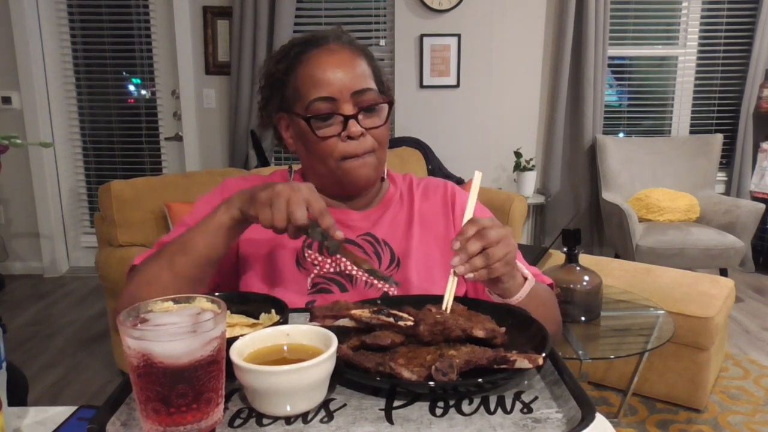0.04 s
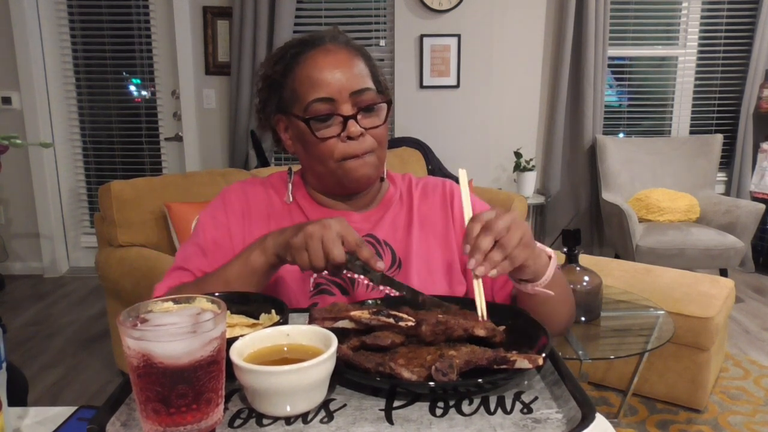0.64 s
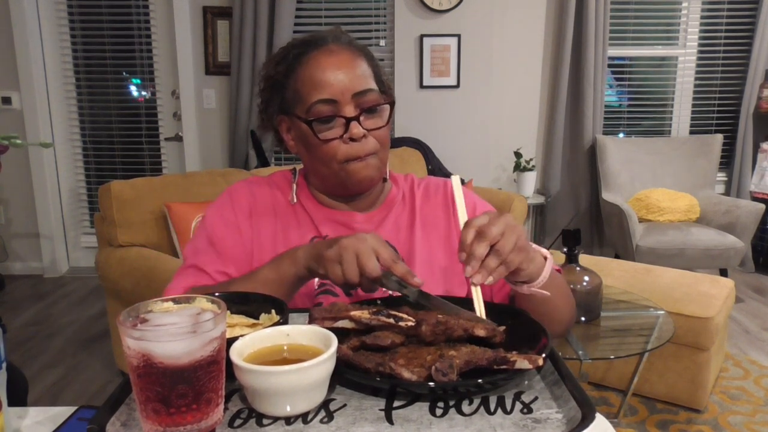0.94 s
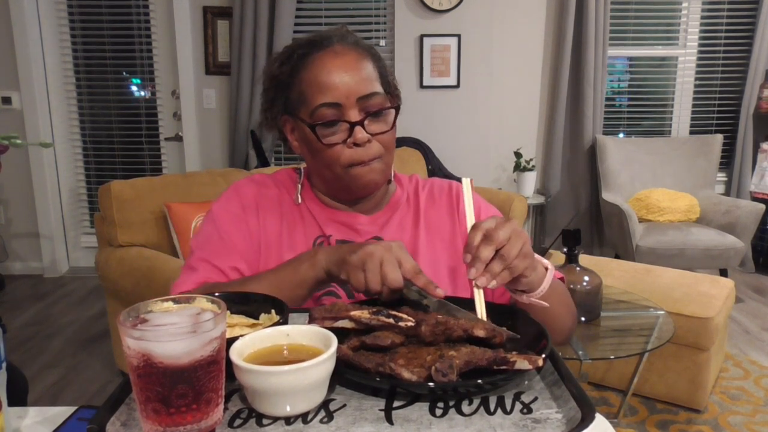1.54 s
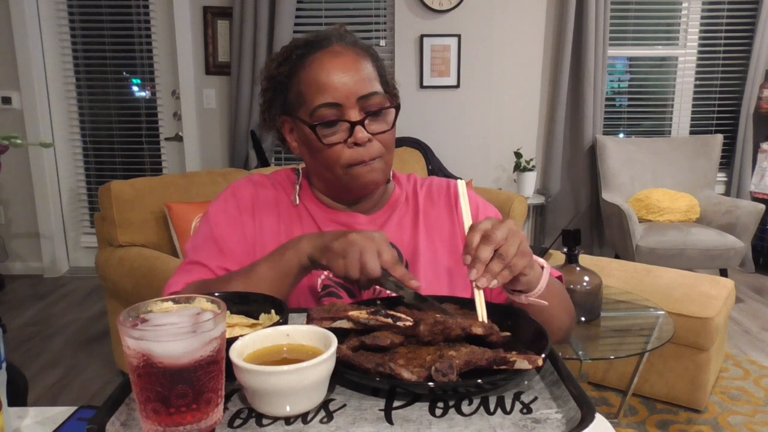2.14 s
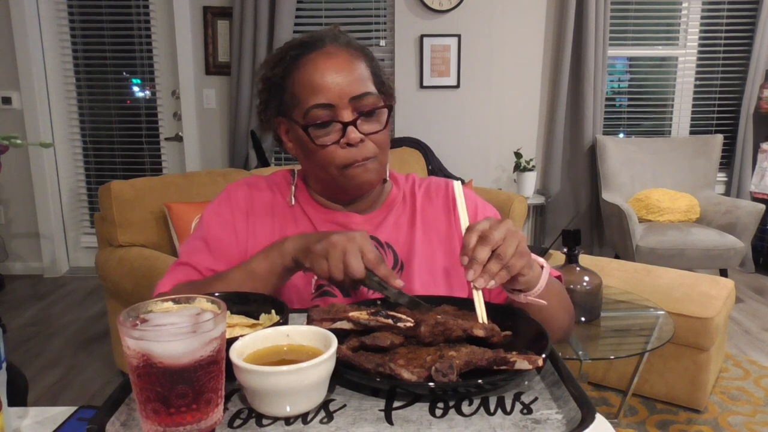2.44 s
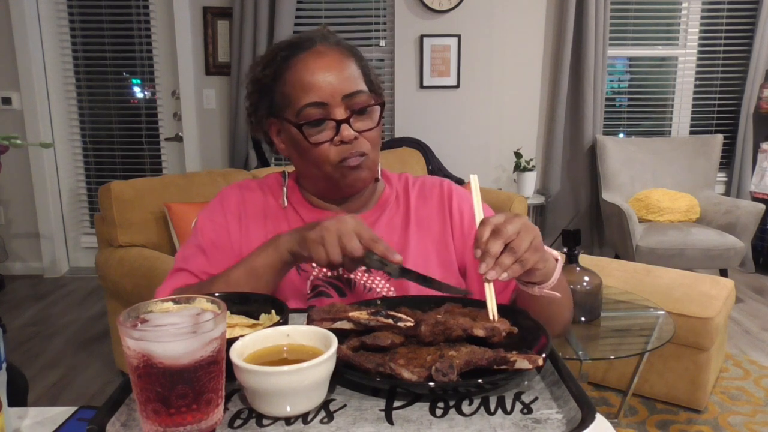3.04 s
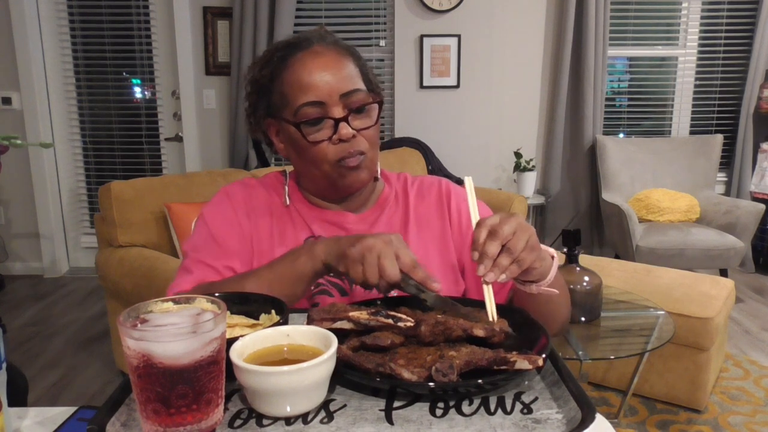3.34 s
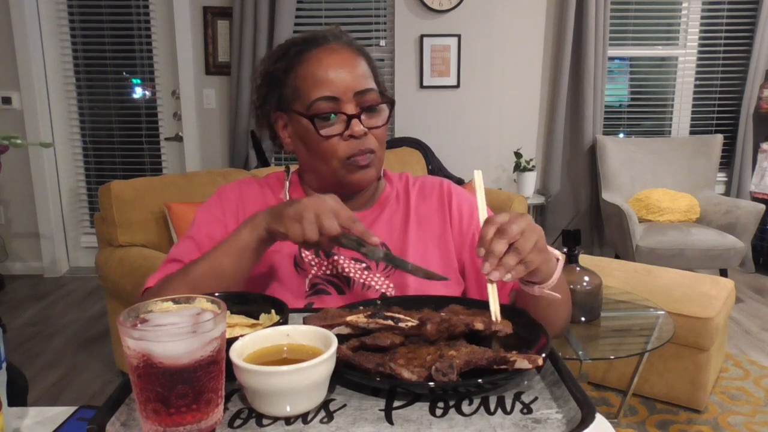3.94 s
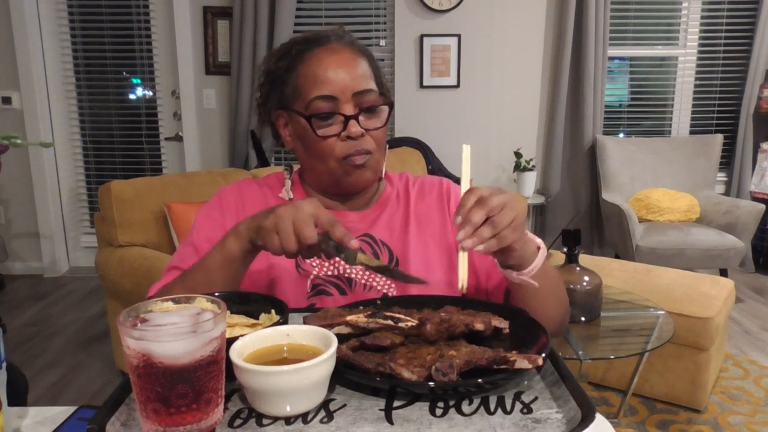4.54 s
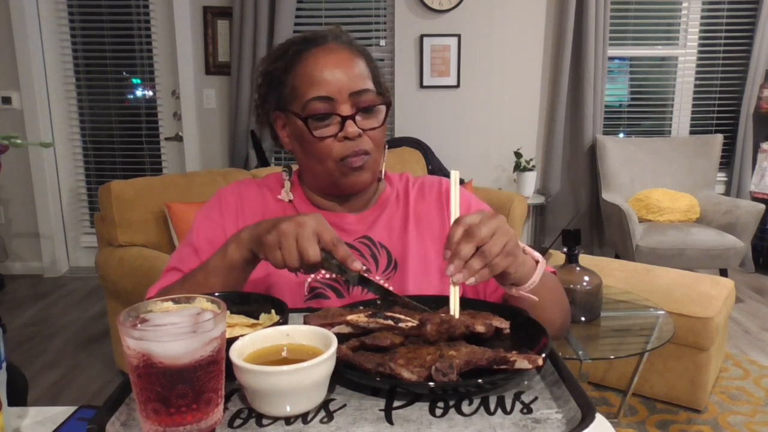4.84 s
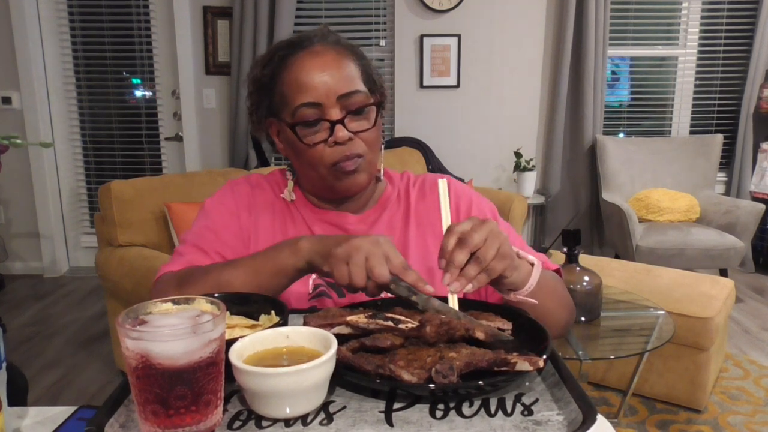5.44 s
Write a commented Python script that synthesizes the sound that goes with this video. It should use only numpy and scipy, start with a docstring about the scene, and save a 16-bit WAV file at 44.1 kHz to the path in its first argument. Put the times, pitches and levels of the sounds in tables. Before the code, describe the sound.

In a living room, a fan gives a steady low hum and rush of air. Close to the microphone, a steel knife strikes a plate with a loud, brief ring, then works through meat, the wet fibres crackling and snapping softly. The serrated blade slips on the plate in thin, squeaky scrapes and touches down lightly. After another, quieter knock, the cutting thins to scattered crackles. The room rings briefly after each knock.

```python
"""You hear a steak knife cutting meat on a plate, close by, in a living room where a fan hums.
The knife knocks twice, ringing its blade and the plate, and touches down lightly a few more times.
Wet fibres crackle and snap as it saws, and its teeth scrape as they catch and slip on the plate.
The room rings after each knock, while an automatic gain control turns the volume down and back up."""
import sys
import numpy as np
from scipy import signal
from scipy.fft import rfft, irfft
from scipy.io import wavfile
from scipy.ndimage import uniform_filter1d

SR = 44100
rng = np.random.default_rng(int(sys.argv[2]) if len(sys.argv) > 2 else 0)


def dump_mix(stems):
    """Bounce the given channels to the path in sys.argv[1] as a 16-bit WAV at rate SR."""
    frames = np.atleast_2d(stems).T  # one column per channel
    limited = np.clip(frames, -1, 1)  # hard clip at full scale
    pcm = np.round(limited * 32767).astype(np.int16)
    wavfile.write(sys.argv[1], SR, pcm)


N = 247401
TIME = np.arange(N) / SR
TOP_HZ = 15900  # upper edge of the treble
# tone colour of a snapping fibre, from low to high: (frequency [Hz], level [dB])
SNAP_COLOUR = [(500, -26), (4000, -19), (6200, -17.5), (7500, -0.5), (9000, -6), (11500, -5.5),
               (14000, -13.5), (16000, -29.5)]


def amp(db):
    """Turns decibels into a factor to multiply by."""
    return 10 ** (np.asarray(db) / 20)


def unit(x):
    """Scales a signal to an average strength (rms) of 1."""
    return x / np.sqrt(np.mean(x ** 2) + 1e-20)


def read(points, hz):
    """Looks up a (frequency, value) table, blending between rows on a pitch scale."""
    table_hz, value = np.transpose(points)
    return np.interp(np.log(hz + 1), np.log(table_hz + 1), value)


def add(mix, start_s, sound):
    """Adds a sound to the mix at the given time."""
    part = mix[..., max(round(start_s * SR), 0):][..., :sound.shape[-1]]
    part += sound[..., :part.shape[-1]]


def through(x, response):
    """Makes every sample of x set off the response; the result has rms 1."""
    return unit(signal.oaconvolve(x, response)[:N])


def click(colour, size=1024):
    """The shortest click with the given tone colour, peak 1."""
    log_gain = np.log(amp(read(colour, abs(np.fft.fftfreq(size, 1 / SR)))))
    pulse = np.fft.ifft(np.exp(np.conj(signal.hilbert(log_gain)))).real
    return pulse / abs(pulse).max()


def burst(colour, decay_s, size=1024):
    """A dying flurry of tiny contacts with the given tone colour, energy 1."""
    t = np.arange(size) / SR
    flurry = rng.standard_normal(size) * np.exp(-t / decay_s)
    even = irfft(np.exp(1j * np.angle(rfft(flurry))))  # all frequencies equally strong
    sound = signal.fftconvolve(even * np.exp(-t / (4 * decay_s)), click(colour))
    return sound / np.linalg.norm(sound)


def ring(tones, size=11025):
    """A struck object rings at its own tones; each fades by 60 dB in its ring time."""
    t = np.arange(size) / SR
    return sum((-1) ** k * amp(db - 60 * t / ring_s) * np.cos(2 * np.pi * hz * t)
               for k, (hz, db, ring_s) in enumerate(tones))


def grains(per_s, spread_db):
    """Clicks of random size at random moments."""
    strength = amp(spread_db * np.minimum(rng.exponential(1, N), 4))
    return strength * rng.choice([-1, 1], N) * (rng.random(N) < per_s / SR)


def pops(per_s, spread_db, cycles, low_hz, count=64, size=128):
    """Tiny contacts, each ringing for a few cycles at its own pitch."""
    hz = np.geomspace(low_hz, TOP_HZ, count)[:, None]
    turns = hz * np.arange(size) / SR
    shapes = hz * turns * np.exp(-2 * turns / cycles) * np.sin(2 * np.pi * turns)
    clicks, pitch = grains(per_s, spread_db), rng.integers(count, size=N)
    starts = np.flatnonzero(clicks)
    places = starts[:, None] + np.arange(size)
    sounds = clicks[starts, None] * shapes[pitch[starts]]
    return unit(np.bincount(places.ravel(), sounds.ravel(), N)[:N])


def waver(below_hz):
    """A slow random wander, rms 1."""
    slow = np.fft.rfftfreq(N, 1 / SR) < below_hz
    return unit(irfft(rfft(rng.standard_normal(N)) * slow, N))


def uneven(depth_db, per_s):
    """A volume that jumps at random as the knife catches and slips, rms 1."""
    step = np.cumsum(rng.random(N) < per_s / SR)
    heights = np.clip(rng.standard_normal(N), -2, 2)
    return unit(uniform_filter1d(amp(depth_db * heights[step]), size=64))


def pushes(rows, attack_s, release_s, growth_db=0):
    """The volume of hand movements: each sets in, holds, grows or wanes, then dies away."""
    gain, t = np.zeros(N), np.arange(SR) / SR
    for start, length, db in rows:
        held = amp(db + growth_db * (np.minimum(t / length, 1) - .5))
        shape = np.minimum(t / attack_s, 1) * held * np.exp(-np.maximum(t - length, 0) / release_s)
        gain += np.interp(TIME, start + t, shape, 0, 0)
    return gain


def left_right(mid, side, likeness):
    """Blends two noises into left and right: likeness 0 is unrelated, 1 is identical."""
    mid, side = mid * np.sqrt(1 + likeness), side * np.sqrt(1 - likeness)
    return np.array([mid + side, mid - side])


def steady_noise(gain):
    """Stereo noise shaped by a gain for each frequency, rms 1."""
    # how alike left and right are: (frequency [Hz], likeness [0-1])
    likeness = [(60, 0.8), (130, 0.76), (290, 0.91), (640, 0.53), (1400, 0.47), (3000, 0.09), (8000, 0.22),
                (15000, 0)]
    hz = np.fft.rfftfreq(N, 1 / SR)
    mid, side = rfft(rng.standard_normal((2, N)))
    return unit(irfft(left_right(mid, side, read(likeness, hz)) * gain, N))


def fan(air_db=-53, drone_db=-51, drone_hz=279, width_hz=22, hiss_db=-66, speed_wander=0.00389):
    """Air rushes, a duct drones and wavering motor tones beat together, over a faint hiss."""
    # tone colour of the rushing air: (frequency [Hz], level [dB])
    air_colour = [(20, -35.5), (45, -40), (70, -7.5), (110, -6.5), (160, -1), (250, 4), (330, -2), (390, 3),
                  (470, -4), (550, -0.5), (650, -8), (1130, -8), (1400, -20), (2000, -32.5)]
    # hum of the motor and the mains power: (pitch [Hz], level [dB])
    hum_tones = [(59.4, -72.5), (199, -68), (255, -75), (283.4, -53), (298, -53), (348.3, -62.5),
                 (415.3, -65), (712.4, -69)]
    # tone colour of the hiss: (frequency [Hz], level [dB])
    hiss_colour = [(500, 10), (1800, 2.5), (2600, 0), (3200, 1), (3480, 10), (3800, -0.5), (4600, 3.5),
                   (5700, -9), (6700, -5), (7500, 6), (10000, 1), (13000, 3.5), (15200, -8.5), (16000, 2)]
    hz = np.fft.rfftfreq(N, 1 / SR)
    air = amp(air_db) * steady_noise(amp(read(air_colour, hz)))
    drone = amp(drone_db) * steady_noise(1 / (1 + ((hz - drone_hz) / (0.71 * width_hz)) ** 2))
    hum = np.zeros(N)
    for pitch_hz, db in hum_tones:
        turns = pitch_hz * np.cumsum(1 + speed_wander * waver(below_hz=4)) / SR + rng.random()
        hum += amp(db) * np.sqrt(2) * np.sin(2 * np.pi * turns)
    hiss = amp(hiss_db) * steady_noise(amp(read(hiss_colour, hz)))
    return air + drone + hum + hiss


def room(x, build_s=0.003, size=44100):
    """The room answers with a few echoes and a wash of reflections whose low notes last longest."""
    # how long the room rings: (frequency [Hz], time to fade by 60 dB [s])
    ring_times = [(250, 1), (1000, 0.48), (3500, 0.58), (7200, 0.52), (10000, 0.46), (15000, 0.25)]
    # how alike the wash is on the left and right: (frequency [Hz], likeness [0-1])
    likeness = [(300, 0.84), (1400, 0.5), (3300, 0.56), (5500, 0.3), (7200, 0), (15000, 0.01)]
    # single bounces off walls and ceiling: (delay [s], level [dB])
    echoes = [(.0097, -15.5), (0.0197, -18.5), (.029, -15.5)]
    # tone colour left after the room soaks up some sound: (frequency [Hz], level [dB])
    room_colour = [(500, -3), (3500, -3.5), (7200, -5), (8200, -7), (9500, -6.5), (12000, -6),
                   (15000, -5.5)]
    hz, t, (mid, side) = signal.stft(rng.standard_normal((2, size)), SR, nperseg=256)
    noise = left_right(mid, side, read(likeness, hz)[:, None])
    decay = amp(-60 * t / read(ring_times, hz)[:, None])
    tail = signal.istft(noise * decay, SR, nperseg=256)[1][:, :size]
    tail *= 1 - np.exp(-np.arange(size) / SR / build_s)
    tail /= np.linalg.norm(tail[0])
    for delay, db in echoes:
        add(tail, delay, amp([db]))
    tone = click(room_colour)
    tail = signal.lfilter(tone / abs(rfft(tone)).max(), [1], tail)
    return signal.fftconvolve(x[None], tail, axes=1)[:, :N]


def bumps(swell_s=0.02, size=8000):
    """The plate or tray gives under a push and sways briefly."""
    # soft bumps under the hands: (time [s], level [dB], pitch [Hz])
    sways = [(0.75, -64.5, 80.2), (1.388, -66.5, 77), (2.19, -45, 409), (4.206, -57.5, 82)]
    out, t = np.zeros(N), np.arange(size) / SR
    swell = t / swell_s * np.exp(1 - t / swell_s)
    for start, db, hz in sways:
        add(out, start, amp(db) * swell * np.sin(2 * np.pi * hz * t))
    return out


def pings(swell_s=0.011, size=16384):
    """A slipping tooth sets one tone of the plate or blade ringing."""
    # tones that swell and ring out: (time [s], level [dB], pitch [Hz], ring time [s])
    tones = [(0.002, -59.5, 2224, 0.27), (2.018, -55, 4150, 0.22), (2.146, -58, 4170, .14),
             (3.706, -61, 4170, 0.4), (3.708, -58, 2910, 0.14), (3.726, -54, 3400, 0.08),
             (3.767, -60, 1735, 0.069)]
    out, t = np.zeros(N), np.arange(size) / SR
    swell = np.minimum(t / swell_s, 1)
    for start, db, hz, ring_s in tones:
        add(out, start, swell * amp(db - 60 * t / ring_s) * np.sin(2 * np.pi * hz * t))
    return out


def dragging(swell_s=0.0083, release_s=.01, size=16384):
    """Rubbing draws a rough tone from blade and plate; its pitch slides as the contact moves."""
    # drags of the blade:
    # (time [s], length [s], level [dB], first pitch [Hz], last pitch [Hz], pitch spread [Hz])
    drags = [(1.833, 0.019, -68, 3010, 3400, 500), (1.99, 0.034, -67, 7400, 7600, 350),
             (2.192, 0.13, -63, 7570, 7760, 450), (2.248, 0.11, -68, 3413, 3750, 400),
             (2.328, .05, -59, 9300, 8560, 1600), (2.496, 0.059, -69, 3510, 3630, 450),
             (2.499, .07, -75, 9400, 9400, 400), (3.497, .03, -63, 7370, 7500, 400),
             (3.435, .1, -63.5, 3030, 3500, 700), (3.55, 0.094, -71, 3430, 3600, 350),
             (3.843, 0.027, -71, 3180, 3200, 450)]
    out, t = np.zeros(N), np.arange(size) / SR
    for start, length, db, first_hz, last_hz, width_hz in drags:
        friction = [1, 1j] @ rng.standard_normal((2, size))
        memory = np.exp(-np.pi * width_hz / SR)  # nearer 1 gives a purer tone
        smoothed = signal.lfilter([1], [1, -2 * memory, memory ** 2], friction)
        flutter = unit(smoothed.view(float)).view(complex)
        pitch_hz = np.interp(t, [0, length], [first_hz, last_hz])
        tone = np.exp(2j * np.pi * np.cumsum(pitch_hz) / SR)
        shape = np.minimum(t / swell_s, 1) * np.exp(-np.maximum(t - length, 0) / release_s)
        add(out, start, amp(db) * shape * (flutter * tone).real)
    return out


def scraping(rasp_db=4, judder_db=1, sing_db=-2, bite_s=0.032, lift_s=0.051):
    """Teeth catch and slip on the plate: they click in a rasp, and the blade judders or sings."""
    # strokes over the plate: (time [s], length [s], rasp [dB], judder [dB], singing [dB])
    strokes = [(-0.04, 0.06, -67.5, -59, -87), (1.782, 0.081, -68, -71, -85),
               (1.956, 0.09, -63.5, -76, -66), (2.129, 0.098, -63.5, -65.5, -58.5),
               (2.262, 0.11, -67, -62, -74), (2.473, 0.08, -65, -64.5, -67), (3.46, 0.13, -67, -68, -66),
               (3.677, 0.051, -71, -65, -78)]
    # tone colour of the tooth clicks: (frequency [Hz], level [dB])
    rasp_colour = [(300, 9), (500, 23.5), (1200, 12), (1800, 5), (2700, -0.5), (3500, 5), (5200, 2.5),
                   (6300, 4.5), (7700, 7), (10000, 4), (13000, -0.5), (16000, -13)]
    # the shaking blade, muffled by the meat: (pitch [Hz], level [dB], ring time [s])
    judder_tones = [(425, 4, 0.03), (1375, -1, 0.0298), (1680, -13.5, 0.015), (2140, -2.5, 0.023),
                    (3430, 2, 0.014), (3900, -6, 0.015), (9500, -24.5, 0.0081)]
    # high tones the blade sings on: (pitch [Hz], level [dB], ring time [s])
    song_tones = [(6280, -2.5, 0.013), (7800, 6, 0.019), (7800, 4, 0.011), (8800, -34, 0.03)]
    slips = grains(per_s=530, spread_db=-4.0)
    grit = pops(per_s=7000, spread_db=2.5, cycles=6, low_hz=600, size=256)
    rasp = amp(rasp_db) * through(grit, click(rasp_colour)) * uneven(depth_db=1.2, per_s=200)
    judder = amp(judder_db) * through(slips, ring(judder_tones))
    song = amp(sing_db) * through(slips, ring(song_tones))
    start, length, rasp_levels, judder_levels, song_levels = np.transpose(strokes)
    # as the hand bears down, the judder grows and the singing is choked
    return (rasp * pushes(zip(start, length, rasp_levels), bite_s, lift_s)
            + judder * pushes(zip(start, length, judder_levels), bite_s, lift_s, growth_db=8)
            + song * pushes(zip(start, length, song_levels), bite_s, lift_s, growth_db=-8))


def touched_spot(sound, spot_hz, falloff_db, size=1024):
    """The spot that is hit favours pitches near its own. Returns a lead-in [s] and the sound."""
    padded = np.pad(sound, size)
    hz = np.fft.rfftfreq(len(padded), 1 / SR)
    octaves_away = np.log2((hz + 1) / spot_hz)
    return size / SR, irfft(rfft(padded) * amp(-abs(falloff_db * octaves_away)), len(padded))


def knocks(chatter_db=7.0):
    """The knife lands and chatters. Returns the direct sound, and rings and cracks for the room."""
    # knocks and light touches: (time [s], blade [dB], plate [dB], crack [dB], favoured pitch [Hz],
    # fall-off [dB per octave], chatter fade [s], ring into room [dB], crack into room [dB])
    landings = [(0.3708, -3, -28, -2.5, 7140, 1, 0.0046, -5.5, -3.5),
                (1.844, -56, -56, -29.5, 3440, 7.5, .006, -6, -4),
                (2.498, -37.5, -61, -52, 3460, 17, .005, -4, -6),
                (2.705, -62, -41.5, -53, 1380, 12, .004, -8, -5),
                (2.7116, -61, -34.5, -54, 1280, 43, .004, -3, -4),
                (3.3592, -39.5, -31, -19.5, 1410, 0, 0.0083, -6, -3.5),
                (3.418, -62, -62, -39, 8500, 7, .004, 3, 3), (3.482, -52, -62, -37, 7400, 11, .005, -6, 4),
                (3.513, -50, -57, -44, 7400, 10, .005, 5, -4),
                (3.676, -58, -46.5, -48, 1390, 7.5, .006, 1, 0)]
    # tones of the steel blade: (pitch [Hz])
    blade_hz = [2202, 2890, 3264, 3490, 3572, 3700, 6900, 7180, 7520, 8080, 8590, 9130, 9490, 9900, 11750,
                14590]
    # strength and fade of each blade tone: (level [dB], ring time [s])
    blade_fades = [(-21.5, 0.068), (-23, 0.034), (-15.5, 0.028), (-21.5, 0.075), (-22, 0.11), (-31, 0.021),
                   (-24, 0.008), (-2, 0.022), (-10.5, 0.017), (-9.5, 0.0073), (-14, .02), (-17.5, .02),
                   (-8.5, 0.022), (-14.5, 0.012), (-11, 0.0085), (-11, 0.012)]
    # tones of the plate: (pitch [Hz])
    plate_hz = [790, 1152, 1300, 1741, 2330, 2509, 2780, 3020, 3900, 4170, 5530, 6510, 7980, 8622, 9700,
                10340, 11170, 13600, 14110]
    # strength and fade of each plate tone: (level [dB], ring time [s])
    plate_fades = [(-3.5, 0.034), (-6.5, 0.05), (-9.5, 0.0409), (-15.5, 0.12), (-4, 0.013), (-17, 0.03),
                   (-8.5, 0.035), (-12, 0.056), (-14, 0.0301), (-8.5, 0.086), (-18, 0.1), (-11.5, 0.061),
                   (0.5, .02), (2.5, 0.026), (0.5, .012), (-5.5, 0.072), (-15.5, 0.0219), (-0.5, .015),
                   (-11.5, .035)]
    # tone colour of a hard contact: (frequency [Hz], level [dB])
    crack_colour = [(150, -25), (420, -5), (800, -0.5), (1200, -6.5), (1800, -11), (2500, -12), (3000, -7),
                    (3900, -4.5), (4600, -10.5), (5500, -8.5), (7500, -2.5), (9800, -2.5), (10500, -6),
                    (11800, -3.5), (12600, -11), (14700, -14.5), (16000, -20.5)]
    # the blade throws its treble to one side: (frequency [Hz], left minus right [dB])
    beam = [(700, 3.5), (1300, -1.5), (4400, -3), (6000, -2.5), (7200, 1.5), (8200, 2), (9500, 15.5),
            (10500, -3), (12000, -3)]
    blade = ring(np.column_stack([blade_hz, blade_fades]))
    plate = ring(np.column_stack([plate_hz, plate_fades]))
    even_crack = click(crack_colour)  # in the room, the chatter's colour evens out
    even_crack /= np.linalg.norm(even_crack)
    direct, rings, cracks = np.zeros((3, N))
    for (start, blade_db, plate_db, crack_db, spot_hz, falloff_db,
         chatter_s, ring_room_db, crack_room_db) in landings:
        ringing = amp(blade_db) * blade + amp(plate_db) * plate
        force = amp(crack_db + chatter_db)
        for path, sound in [(direct, ringing),
                            (direct, force * burst(crack_colour, chatter_s)),
                            (rings, amp(ring_room_db) * ringing),
                            (cracks, amp(crack_room_db) * force * even_crack)]:
            lead_s, coloured = touched_spot(sound, spot_hz, falloff_db)
            add(path, start - lead_s, coloured)
    beam_db = read(beam, np.fft.rfftfreq(N, 1 / SR))
    return irfft(rfft(direct) * amp([beam_db / 2, -beam_db / 2]), N), rings, cracks


def snaps(snap_db=-1, tear_s=0.00066, falloff_db=16):
    """Larger fibres let go, each in a tiny burst around its own pitch."""
    # snaps of fibre and fat: (time [s], level [dB], pitch [Hz])
    breaks = [(0.179, -48, 11500), (0.748, -40.5, 10000), (1.1131, -51, 9000), (1.124, -45, 9200),
              (1.1894, -48, 8500), (1.2136, -44, 7300), (1.2507, -46.5, 8000), (1.3113, -43.5, 11000),
              (1.517, -40.5, 8000), (1.569, -39.5, 10000), (1.6815, -49.5, 8700), (1.778, -29.5, 8400),
              (1.8115, -50, 8800), (2.043, -39, 11000), (2.1926, -47, 8000), (2.272, -41, 10500),
              (2.364, -43, 9300), (2.376, -34.5, 8650), (2.661, -50, 9420), (2.7748, -47, 10040),
              (3.1158, -51, 10500), (3.76, -39, 10300), (4.185, -47, 9000), (4.9177, -47.5, 9000),
              (4.9329, -35, 8200), (4.9667, -49, 9000)]
    out = np.zeros(N)
    for start, db, pitch_hz in breaks:
        colour = [(hz, level - falloff_db * min(abs(np.log2(hz / pitch_hz)), .5))
                  for hz, level in SNAP_COLOUR]
        tear = burst(colour, tear_s)
        add(out, start + 0.0013, amp(db + snap_db) * tear / abs(tear).max())
    return out


def cutting(crackle_db=-4.0, tick_db=-12.0):
    """Wet fibres part in a dense, gritty crackle, with scattered ticks from thicker ones."""
    # pushes of the knife through the meat: (time [s], length [s], level [dB])
    cuts = [(1.0, 0.42, -66.5), (1.44, 0.12, -65.5), (1.562, 0.064, -63), (1.742, 0.064, -57),
            (1.93, 0.096, -63), (2.175, 0.088, -56.5), (2.32, 0.048, -60), (2.49, 0.26, -69),
            (3.647, 0.13, -64), (4.156, 0.026, -68.5), (4.27, 0.04, -72), (4.92, 0.078, -67.5),
            (5.229, 0.18, -65.5), (5.473, 0.1, -65)]
    # tone colour of the wet crackle: (frequency [Hz], level [dB])
    wet_colour = [(500, -39), (1500, -9), (4000, -5), (6200, -9.5), (7500, -0.5), (9000, 2), (11500, -5),
                  (14000, -6), (16000, -38)]
    thin = pops(per_s=4800, spread_db=3.3, cycles=4, low_hz=1000)
    thick = pops(per_s=130, spread_db=3, cycles=5, low_hz=6500)
    crackle = amp(crackle_db) * through(thin, click(wet_colour)) * uneven(depth_db=1.5, per_s=56)
    ticks = amp(tick_db) * through(thick, click(SNAP_COLOUR))
    # tension builds through a push, then the fibres give way
    return pushes(cuts, attack_s=0.012, release_s=0.031, growth_db=8) * (crackle + ticks)


def scene(scrape_room_db=-6, meat_room_db=-7, ping_room_db=-13, balance_db=-0.47):
    """Knife and meat in the middle, room and fan all around."""
    hits, rings, cracks = knocks()
    scrape = scraping() + dragging()
    meat = cutting() + snaps()
    ping = pings()
    reflections = room(rings + amp(ping_room_db) * ping)
    reflections += room(cracks + amp(scrape_room_db) * scrape + amp(meat_room_db) * meat)
    mix = hits + scrape + meat + ping + bumps() + reflections + fan()
    return mix * amp([[balance_db / 2], [-balance_db / 2]])


def record(dry, threshold_db=-30, slope=0.306, recovery_db_per_s=55):
    """Gain control dips the volume at loud knocks and recovers; then the highest treble is cut."""
    power = uniform_filter1d((dry ** 2).mean(0), size=64)
    excess_db = np.maximum(10 * np.log10(abs(power) + 1e-12) - threshold_db, 0)
    recovery_db = TIME * recovery_db_per_s
    dip_db = np.maximum.accumulate(slope * excess_db + recovery_db) - recovery_db
    dipped = dry / amp(uniform_filter1d(dip_db, size=32))
    treble_cut = signal.firwin(511, TOP_HZ, window=("kaiser", 9), fs=SR)
    return signal.oaconvolve(dipped, treble_cut[None], "same")


dry = scene()
out = record(dry)
dump_mix(out)
```